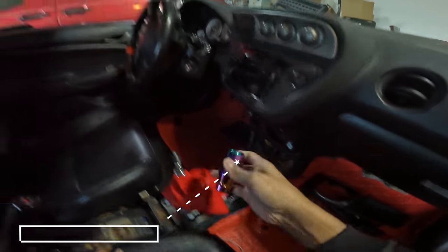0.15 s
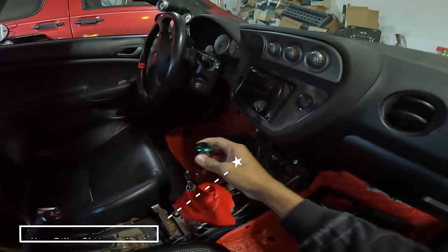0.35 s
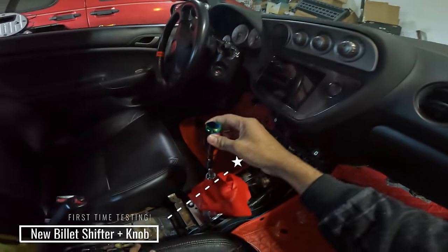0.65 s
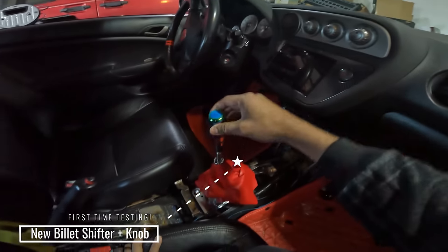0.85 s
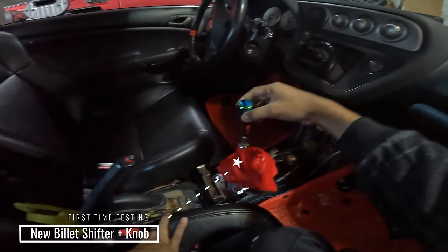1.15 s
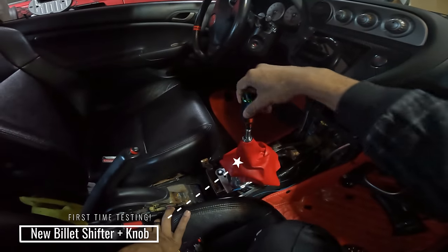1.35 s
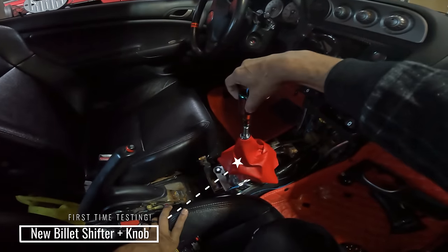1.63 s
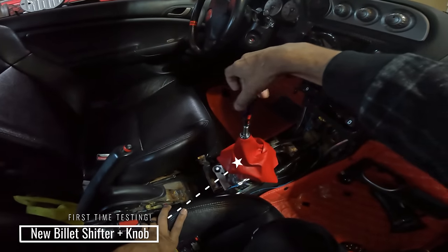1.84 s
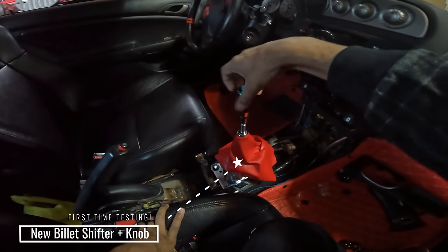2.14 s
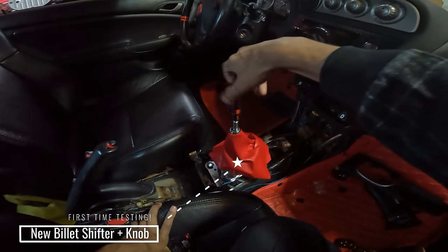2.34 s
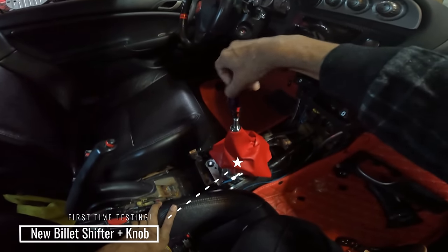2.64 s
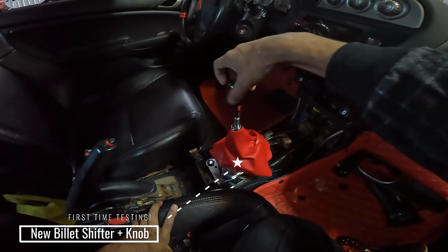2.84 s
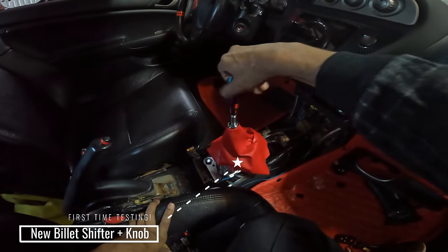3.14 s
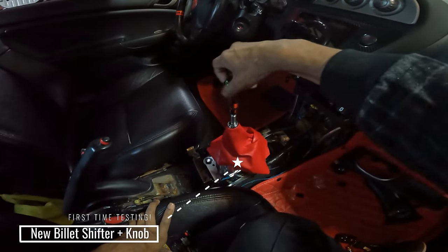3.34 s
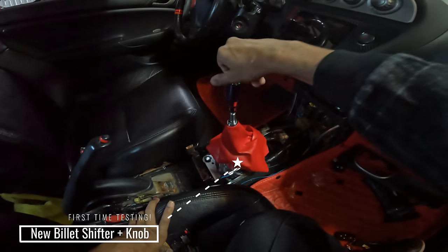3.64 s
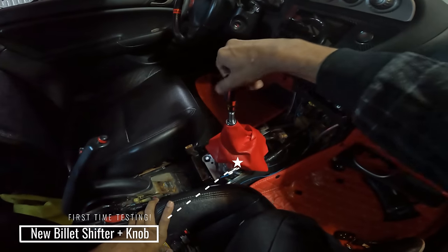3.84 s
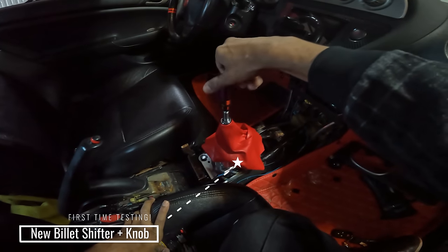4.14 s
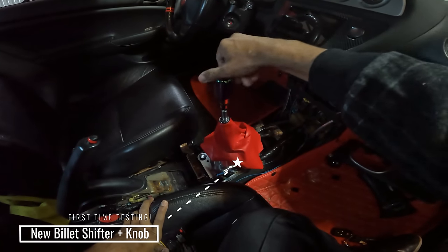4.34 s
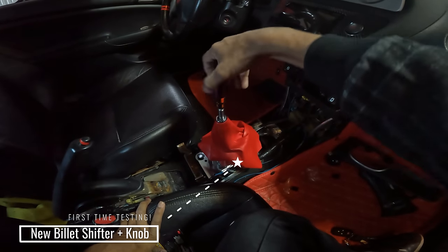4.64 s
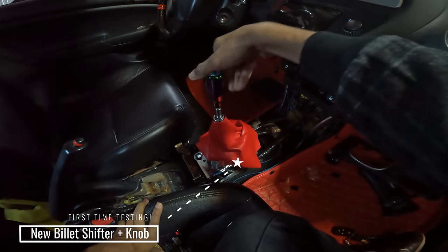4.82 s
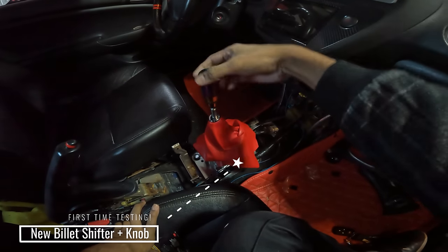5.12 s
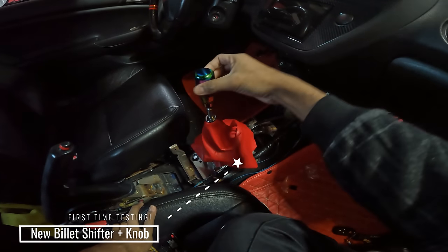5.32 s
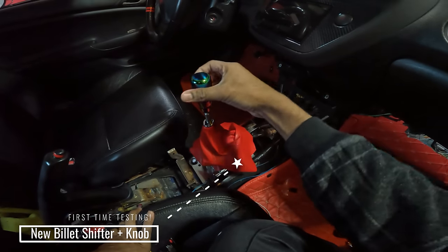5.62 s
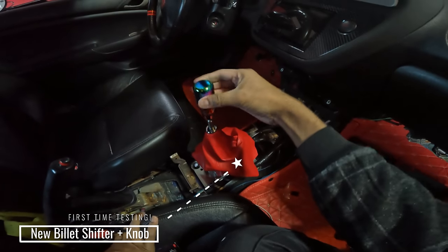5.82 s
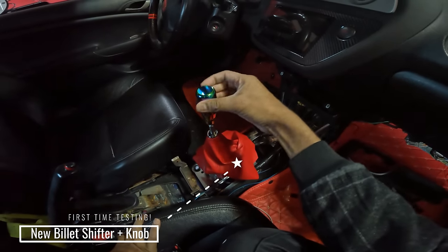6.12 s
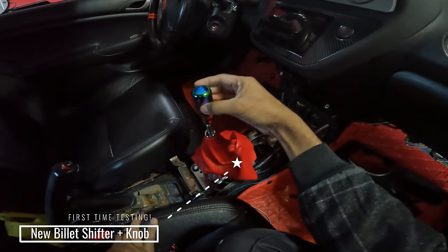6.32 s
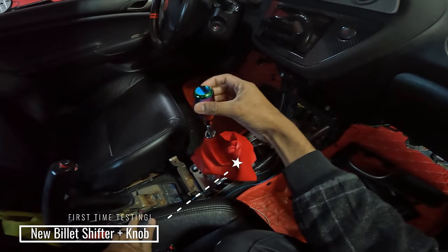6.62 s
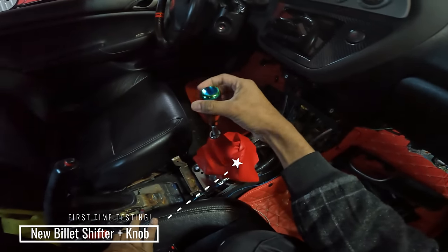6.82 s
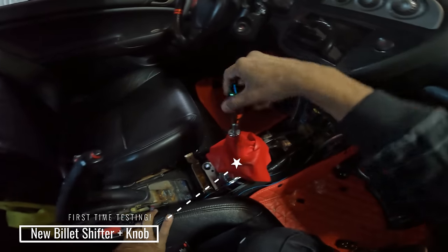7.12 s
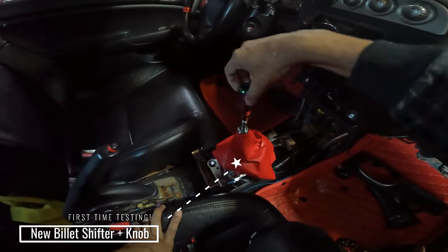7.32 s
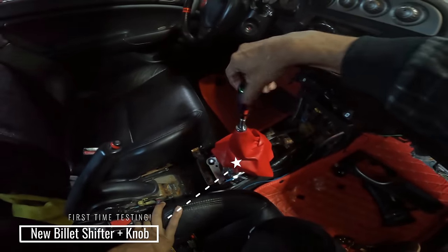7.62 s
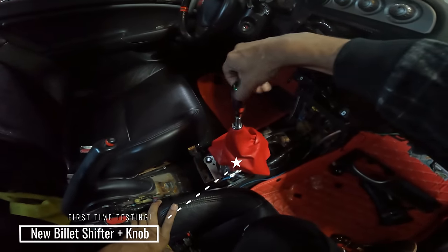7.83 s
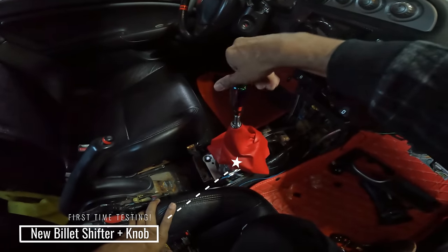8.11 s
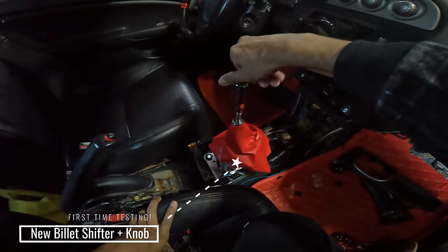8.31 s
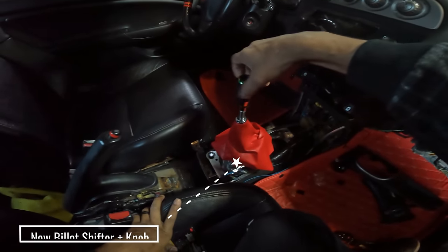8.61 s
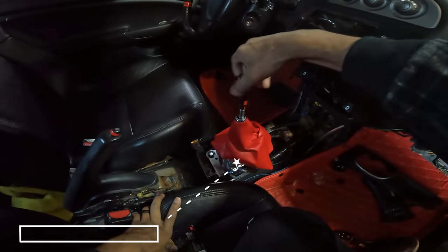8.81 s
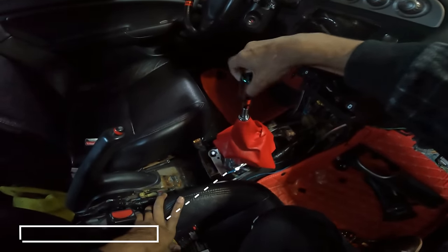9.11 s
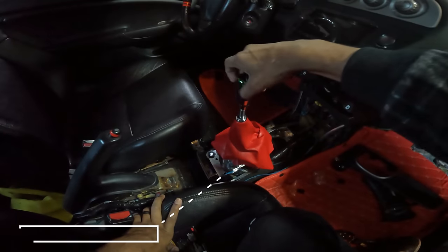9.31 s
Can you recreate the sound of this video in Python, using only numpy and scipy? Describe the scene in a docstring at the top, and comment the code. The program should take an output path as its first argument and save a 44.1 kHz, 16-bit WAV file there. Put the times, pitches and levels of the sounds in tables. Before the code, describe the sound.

A metal gear lever is worked by hand in a still car, heard near in dry stereo. First a dry tick on the left and gritty creaks on the right, then two bright, loud metallic knocks. After that, many quieter woody-metal clunks, soft thuds, short slides, cloth rubs and tiny trim ticks follow unevenly. Thin squeaky scrapes appear late. Wavering bass rumble and soft hiss continue throughout.

```python
"""A fluttering low rumble and microphone hiss run throughout; in the first half second a panel creaks
close on the right. Inside a parked, stripped car cabin, heard from close by, a hand works a metal gear lever.
Stops in the gate ring struck modes of floor pan, housing and linkage; loose metal rattles, the shaft squeaks.
Cloth rustle, sliding and hum are noise through resonances; trim ticks are short contacts through one band."""
import sys
import numpy as np
from scipy import signal
from scipy.fft import rfft, irfft
from scipy.io import wavfile
from scipy.ndimage import uniform_filter1d

SR = 44100
rng = np.random.default_rng(int(sys.argv[2]) if len(sys.argv) > 2 else 0)


def unload_audio(sound):
    """Save the sound as a 16-bit wav file, at the path given as the first command line argument."""
    columns = np.transpose(np.atleast_2d(sound))
    # keep every value between -1 and 1, then stretch to whole-number steps
    steps = np.round(np.clip(columns, -1, 1) * 32767)
    wavfile.write(sys.argv[1], SR, steps.astype(np.int16))


def volts_from_db(level):
    """Convert decibel levels to linear amplitude ratios."""
    exponent = np.asarray(level, float) / 20
    return 10 ** exponent


N = 417186
TIME = np.arange(N) / SR
SIDES = np.array([[1], [-1]])  # left, right


def unit_rms(x):
    """Scale to rms 1, all channels together."""
    return x / np.sqrt(np.mean(x ** 2))


def curve(points):
    """A (t/s, value) table at every sample."""
    return np.interp(TIME, *np.transpose(points))


def walk(rate):
    """Random levels held 1 / rate s and slewed twice; rms 1 before the cut to length."""
    hold = int(SR / rate)
    steps = np.repeat(rng.standard_normal(N // hold + 1), hold)
    slewed = uniform_filter1d(uniform_filter1d(steps, hold), hold)
    return unit_rms(slewed)[:N]


def coloured_pair(spectrum):
    """Two channels of steady noise, joint rms 1, with a (f/Hz, level/dB) spectrum."""
    hz, db = np.transpose(spectrum)
    f = np.maximum(np.fft.rfftfreq(N, 1 / SR), 1)
    gain = volts_from_db(np.interp(np.log(f), np.log(hz), db))
    return unit_rms(irfft(rfft(rng.standard_normal((2, N))) * gain, N))


def band(x, hz, width, times=1):
    """One resonance, gain 1 at its centre, passed several times for steeper sides."""
    for _ in range(times):
        x = signal.lfilter(*signal.iirpeak(min(hz, .45 * SR), hz / width, SR), x)
    return x


def add(out, s, sound):
    """Mix a short sound in at time s."""
    i = int(s * SR)
    out[:, i:i + sound.shape[1]] += sound[:, :N - i]


def strokes(rows, rise_s, fall_s):
    """Gain of (start, length, dB) strokes: linear rise, hold, exponential fall."""
    out = np.zeros(N)
    for s, length, db in rows:
        t = np.maximum(TIME - s, 0)
        out += volts_from_db(db) * np.minimum(t / rise_s, 1) * np.exp(-np.maximum(t - length, 0) / fall_s)
    return out


def ring(modes, rise_s, scatter_db, detune, apart, chatter_s, near_hz=None, free=1, play=0.019, focus_db=0):
    """One blow on a part: modes swell over the contact, are struck again by loose play, and die. Mid peak 1."""
    hz, db, t60 = np.array(modes).T[:, :, None]
    t = TIME[:SR // 4]
    chance = rng.standard_normal((len(modes), 5)).T[:, :, None]
    if near_hz:
        # where the blow lands favours the modes near one pitch; focus_db is the fall per squared octave
        deepest_db = -14
        db = db + np.maximum(-focus_db * np.log2(hz / near_hz) ** 2, deepest_db)
    phase = 2 * np.pi * hz * (1 + detune * chance[0]) * t + 0.52 * chance[1]
    swell = (1 - np.exp(-t / rise_s)) ** 2
    shape = volts_from_db(db + scatter_db * chance[2] - 60 * t / (free * t60)) * swell
    # each ear hears its own phases
    ears = np.array([(shape * np.sin(phase + min(apart, .7) * c)).sum(0) for c in chance[3:]])
    # uneven random rebounds after the first contact
    t_play = t[:SR // 16]
    rebounds = rng.standard_normal(len(t_play)) ** 3 * np.exp(-t_play / chatter_s) * play
    rebounds[0] = 1
    ears = signal.fftconvolve(ears, rebounds[None])[:, :len(t)]
    return ears / np.abs(ears.mean(0)).max()


def burst(hz, width, rise_s, fall_s):
    """A puff of noise in one steep band, unrelated left and right. Peak 1."""
    t = TIME[:SR // 8]
    puff = rng.standard_normal((2, len(t))) * (1 - np.exp(-t / rise_s)) * np.exp(-t / fall_s)
    puff = band(puff, hz, width, times=3)
    return puff / np.abs(puff).max()


# Shape of the low rumble: f/Hz, relative level/dB per Hz
RUMBLE_SPECTRUM = [(8.8, -53), (15, 1.5), (43, 5), (81, -6.5), (110, -13), (140, -42), (240, -120)]
# Slow course of the rumble, around which it flutters: t/s, level/dB
RUMBLE_COURSE = [(0, -51), (.7, -62), (1.1, -53.5), (1.6, -57), (2.6, -52), (4.3, -50.5), (4.9, -51.5),
                 (5.6, -52), (6.6, -52.5), (7.0, -54.5), (8.2, -50), (9.46, -51.5)]


def rumble():
    """Low noise nearly alike at both microphones, its level fluttering a few times a second."""
    mid, side = coloured_pair(RUMBLE_SPECTRUM)
    flutter_db = 3.37 * walk(6)
    return volts_from_db(curve(RUMBLE_COURSE) + flutter_db) * (mid * volts_from_db(0.77 * SIDES) + 0.13 * side * SIDES)


# Shape of the steady noise floor: f/Hz, relative level/dB per Hz
HISS_SPECTRUM = [(59, -20), (100, -2), (160, -9.5), (249, -16), (373, -16.5), (452, -30.5), (676, -21.5),
                 (752, -26), (1800, -32.5), (2580, -32.5), (5650, -39), (15000, -39), (16000, -41)]


def hiss():
    """Steady noise, wavering slightly; the two ports hear the same bass but their own treble."""
    mid, side = coloured_pair(HISS_SPECTRUM)
    side = signal.lfilter(*signal.butter(1, 500, "high", fs=SR), side)
    return volts_from_db(-63.5 + 0.4 * walk(3.8)) * (mid + side * SIDES)


# How hard the hand works the lever: t/s, level/dB
HAND_EFFORT = [(0.0, 8.5), (.45, 9.5), (0.8, 2.5), (1.2, 14.5), (1.6, -2.5), (2.16, -1.5), (3.0, -6.5),
               (3.9, -3), (4.2, -2.5), (4.82, 1.5), (5.12, 8), (5.24, 10), (5.95, 4), (6.3, 5.5),
               (6.46, 1.5), (7.22, -1.5), (7.83, 5.5), (8.7, -17), (9.46, 1)]


def effort_db():
    """Level offset that follows the force of the hand."""
    return curve(HAND_EFFORT)


# Lever slides along its gate, swelling into a stop: t/s of start, length/s, level/dB
GATE_SLIDES = [(1.78, 0.032, -63.5), (2.05, 0.071, -63.5), (2.33, 0.039, -61.5), (2.52, 0.063, -66.5),
               (2.7, 0.042, -69), (2.79, 0.035, -66.5), (2.98, 0.067, -67), (3.09, 0.033, -76),
               (3.21, 0.05, -63.5), (3.4, 0.11, -72), (3.63, 0.031, -74), (3.93, 0.024, -55.5),
               (4.15, 0.071, -67), (4.35, 0.04, -60), (4.53, 0.059, -63.5), (4.78, 0.056, -61),
               (5.14, 0.023, -60), (5.88, 0.12, -78), (6.39, 0.087, -78), (6.62, 0.02, -59.5),
               (7.5, 0.044, -64), (7.75, 0.049, -59.5), (7.93, 0.036, -60.5), (8.1, 0.1, -67),
               (8.32, 0.092, -66), (8.53, 0.087, -62), (8.78, 0.065, -62.5), (8.96, 0.048, -61),
               (9.24, 0.048, -62)]


def sliding():
    """Gain of the slides, shared by the hum and the drag."""
    return strokes(GATE_SLIDES, rise_s=0.019, fall_s=0.0081)


def shaking(column, top_db=0):
    """Gain that each blow kicks up and that then dies away; column 1 is the thud, 2 the housing ring."""
    kicks = np.zeros(N)
    for row in STOPS + SOFT_LEANS:
        kicks[int(row[0] * SR)] += volts_from_db(min(row[column], top_db))
    fall_s = 0.023
    keep = np.exp(-1 / (fall_s * SR))
    # two equal poles: a lone kick peaks at its own level one fall time later
    return signal.lfilter([np.e * (1 - keep)], np.convolve([1, -keep], [1, -keep]), kicks)


def hum():
    """The structure humming under the hand: shaken noise through one pan and one housing resonance."""
    mid, side = rng.standard_normal((2, N))
    shake = (mid + 0.5 * side * SIDES) * volts_from_db(3.94 * walk(20))
    effort, slide = effort_db(), sliding()
    # steady hum + slides + shaking left by the blows
    pan = volts_from_db(-66 + effort) + volts_from_db(2.5) * slide + volts_from_db(-28) * shaking(column=1)
    housing = volts_from_db(-90 + effort) + volts_from_db(-0.5) * slide + volts_from_db(-19.5) * shaking(column=2)
    return pan * unit_rms(band(shake, 158.2, 40.0)) + housing * unit_rms(band(shake, 356.1, 9.2))


def drag():
    """Dense uneven slips of the loose linkage: dull, broad noise that swells while the lever slides."""
    slips = rng.standard_normal((3, N)) * volts_from_db(4 * walk(60))
    slips = slips[0] + 3.2 * slips[1:]  # a little in common, mostly each ear's own
    # the scuffing after a blow is faint: the hand caps its strength at -56 dB
    scuff = volts_from_db(-53) * shaking(column=1, top_db=-56)
    gain = volts_from_db(-77.5 + 0.8 * effort_db()) + scuff + sliding()
    return gain * unit_rms(band(band(slips, 496, 570), 530, 930))


# Modes of the creaking panel: f as a ratio to the slip's f, width/Hz of each pass, relative level/dB
PANEL_MODES = [(.68, 336, -6.5), (1, 544, 2.5), (1.55, 900, -14.5), (2.4, 1800, -22)]


def slip(hz):
    """One slip rings the panel, close to the right port. Peak 1 before the ears' levels."""
    t = TIME[:SR // 40]
    push = rng.standard_normal(len(t)) * (0.24 * np.exp(-t / 0.00029) + 0.032 * np.exp(-t / 0.022))
    push += 1.35 * np.exp(-(t / 0.00005 - 2) ** 2)
    sound = np.zeros(len(t))
    for k, (ratio, width, db) in enumerate(PANEL_MODES):
        sound += (-1) ** k * volts_from_db(db) * band(push, ratio * hz, width, times=2)  # signs alternate
    return volts_from_db([[-40], [6]]) * sound / np.abs(sound).max()


# Slips of a creak on the right: t/s, peak level/dB of the mid, main f/Hz
CREAK_SLIPS = [(0.0662, -53, 2370), (0.11, -47.5, 2620), (0.149, -54, 2400), (0.2761, -41, 2260),
               (0.2881, -40.5, 2480), (0.316, -46, 2230), (0.3614, -35, 2050), (0.37, -32, 2190),
               (0.3776, -31.5, 2330), (0.3886, -32.5, 2280), (0.4384, -29, 2180), (0.446, -29, 2320),
               (0.4533, -31, 2220), (0.466, -35.5, 2300)]


def creak():
    """Every slip rings the same set of panel modes, shifted to its own pitch."""
    out = np.zeros((2, N))
    for s, peak_db, hz in CREAK_SLIPS:
        add(out, s, volts_from_db(peak_db) * slip(hz))
    return out


# Bands of the weave: f/Hz, width/Hz of each pass, relative level/dB
WEAVE_BANDS = [(2680, 550, 9), (3390, 1560, 10), (4020, 650, 1.5)]
# High, airy swishes: t/s of start, length/s, level/dB before the mix of sheen and air
AIRY_SWISHES = [(0.197, 0.0093, -62), (0.477, 0.014, -65.5), (1.18, 0.43, -79.5), (1.81, 0.037, -75),
                (3.23, 0.031, -76.5), (3.45, 0.028, -79), (3.69, 0.036, -76), (4.16, 0.032, -76.5),
                (4.8, 0.016, -74), (5.88, 0.018, -80), (6.23, 0.025, -79), (6.39, 0.014, -71),
                (6.47, 0.018, -70.5), (6.63, 0.014, -77), (6.85, 0.012, -69), (6.885, 0.013, -71),
                (7.21, 0.071, -74), (7.45, 0.077, -78), (8.55, 0.039, -83), (8.99, 0.027, -75),
                (9.22, 0.044, -73)]
# Sleeve rubs: t/s of start, length/s, level/dB before the left-right lean
SLEEVE_RUBS = [(0.72, 0.038, -74.5), (0.8, 0.086, -67.5), (1.17, 0.093, -70), (1.3, 0.28, -74.5),
               (1.61, .14, -71.5), (1.91, 0.016, -72.5), (1.96, 0.037, -68.5), (2.08, 0.045, -67),
               (2.2, 0.08, -66.5), (2.285, 0.067, -62), (2.36, 0.045, -74), (2.45, 0.036, -70.5),
               (2.56, 0.074, -68), (2.66, 0.021, -73), (2.805, 0.042, -67.5), (3.09, 0.03, -74),
               (3.15, 0.013, -73), (3.32, 0.013, -70.5), (3.5, 0.065, -76.5), (3.64, 0.018, -71),
               (3.77, 0.017, -76), (3.97, 0.073, -75), (4.43, 0.03, -71.5), (4.58, 0.075, -76),
               (4.72, 0.23, -76.5), (5.17, 0.073, -71.5), (5.26, 0.077, -69.5), (5.36, 0.49, -74),
               (5.88, 0.2, -71.5), (6.1, 0.19, -76), (6.62, 0.024, -73), (6.71, 0.06, -73),
               (7.02, 0.047, -71), (7.065, 0.067, -69), (7.14, 0.051, -72), (7.19, 0.19, -77),
               (8.75, 0.036, -76), (9.23, 0.092, -79)]


def cloth():
    """Fibres slipping near the left port: noise in the weave's bands with a sheen above; swishes reach the top."""
    fibres = rng.standard_normal((2, N)) * volts_from_db(1.0 * walk(90))
    rustle = unit_rms(sum(volts_from_db(db) * band(fibres, hz, width, times=2) for hz, width, db in WEAVE_BANDS))
    sheen = unit_rms(band(fibres, 9360, 3300, times=2))
    air = unit_rms(band(fibres, 11900, 4700, times=2))
    rub = volts_from_db(6 * SIDES) * rustle + volts_from_db(-6.5) * sheen
    swish = volts_from_db(1.5 * SIDES) * (sheen + 1.34 * air)
    rise_s, fall_s = 0.0052, 0.0089
    return strokes(SLEEVE_RUBS, rise_s, fall_s) * rub + strokes(AIRY_SWISHES, rise_s, fall_s) * swish


# Modes of the loose metal: f/Hz, relative level/dB, t60/s (shortened to 0.5-0.9 of this by the blow)
LOOSE_MODES = [(2170, -4, 0.075), (2354, -5, .08), (2518, -1, 0.074), (2640, 0, .06), (2620, 4.5, 0.069),
               (2720, -5.5, 0.049), (2800, -1.5, .07), (2970, -10, .06), (3186, -1.5, 0.038),
               (3370, 2, 0.08), (3600, 2, 0.066), (3807, -3, 0.069), (3930, -3, .06), (4180, -9, 0.043)]
# Bright rattles: t/s, level/dB that both noise and ring sit below
METAL_RATTLES = [(0.199, -48.5), (0.529, -45), (0.547, -51), (0.558, -55), (0.638, -44), (0.899, -29.5),
                 (1.074, -39), (1.088, -42.5), (1.106, -27), (1.113, -28), (1.124, -41), (1.818, -48.5),
                 (2.779, -45), (4.575, -59), (4.799, -48.5), (4.998, -51), (5.146, -47), (6.391, -45),
                 (6.522, -53), (7.776, -52), (8.144, -60), (9.269, -54)]


def rattles():
    """Loose metal: a puff of bright noise and chattering modes that ring longer after a hard blow."""
    out = np.zeros((2, N))
    for s, db in METAL_RATTLES:
        free = np.interp(db, [-45, -30], [.5, .9])
        add(out, s, volts_from_db(db - 3.5) * burst(2660, 3000, 0.0017, 0.0088))
        metal = ring(LOOSE_MODES, 0.00057, 2.2, 0.0068, 0.82, 0.0081, free=free, play=0.026)
        add(out, s, volts_from_db(db - 7.5) * metal)
    return out


def click(hz, pan_db):
    """A short gritty contact through one broad resonance, with a faint echo off the cabin. Mid peak 1."""
    t = TIME[:SR // 40]
    echo = 0.015 * rng.standard_normal((2, len(t))) * np.exp(-t / 0.011)
    contact = np.exp(-(t / 0.00003 - 2) ** 2)
    grit = 0.8 * rng.standard_normal(len(t)) * np.exp(-t / 0.0007)
    sound = band(echo + contact + grit, hz, hz, times=2) * volts_from_db(pan_db * SIDES / 2)
    return sound / np.abs(sound.mean(0)).max()


# Dry ticks of trim and camera case: t/s, peak level/dB of the mid, f/Hz, left minus right level/dB
TRIM_TICKS = [(0.2179, -30, 10400, 23), (0.217, -38, 3900, 26), (1.3893, -52, 6400, 7),
              (1.4613, -46, 6600, 11), (1.825, -51, 7330, 0.5), (4.7114, -57, 7210, 1.0),
              (4.805, -53, 8840, -2), (4.923, -48, 9690, -11), (5, -53, 6010, 17), (6.3934, -57, 6040, 2),
              (6.4717, -50, 12900, -13), (6.7017, -56, 6330, -0.5), (6.854, -48, 8300, -7),
              (6.8853, -55, 11400, -8), (7.7003, -55, 9280, -9), (9.212, -59, 8000, -1.5)]


def ticks():
    """Broad bright ticks, each resonance as wide as its centre frequency."""
    out = np.zeros((2, N))
    for s, peak_db, hz, pan_db in TRIM_TICKS:
        add(out, s, volts_from_db(peak_db) * click(hz, pan_db))
    return out


# Modes of the floor pan: f/Hz, relative level/dB, t60/s
PAN_MODES = [(69.4, -6.5, 0.12), (120, -11, 0.18), (145.6, 2.5, 0.15), (188, -19.5, 0.16)]
# Modes of the lever housing: f/Hz, relative level/dB, t60/s
HOUSING_MODES = [(241, -12.5, 0.096), (306.3, -10.5, 0.17), (358.3, 6, 0.079), (369.9, -7, 0.23),
                 (469.5, -9, 0.089), (537.6, -9, 0.05)]


def heavy(thud_db, ring_db, soft):
    """Floor pan and housing under one blow, swelling late; soft (0-1) lengthens the contact."""
    thud = ring(PAN_MODES, 0.0034 + 0.0028 * soft, 3.0, 0.052, 0.16, 0.0036)
    housing = ring(HOUSING_MODES, 0.0035 + 0.011 * soft, 0.25, 0.0027, 0.83, 0.0066)
    return volts_from_db(thud_db) * thud + volts_from_db(ring_db) * housing


# Modes of the linkage: f/Hz, relative level/dB, t60/s (scaled by how free the blow leaves it)
LINKAGE_MODES = [(621, 3.5, 0.1), (679, 1.5, 0.11), (763, 1.5, 0.07), (831, 1.5, 0.073), (933, -1, 0.11),
                 (1011, 2, 0.11), (1128, 0, 0.11), (1261, 1, 0.093), (1346, -2, .08), (1484, -1, 0.086),
                 (1574, 4.5, 0.08), (1745, -11, 0.049), (1940, 0, 0.091), (2100, -21, 0.08)]
# Lever meets a hard stop: t/s, floor thud level/dB, housing ring level/dB, linkage clack level/dB, clack f/Hz
# (levels before the lever's lean to the right)
STOPS = [(0.516, -47.5, -51, -45, 840), (0.529, -46.5, -50.5, -44, 1600), (0.538, -60, -64, -43.5, 1000),
         (0.558, -67, -68, -57, 1600), (0.582, -36.5, -43, -41, 860), (0.597, -46, -47, -49, 1100),
         (0.639, -48, -64, -46, 1660), (0.681, -61, -62, -53, 1570), (0.683, -70, -60, -53, 860),
         (0.9, -23.5, -26, -24, 1045), (1.073, -36, -38.5, -35.5, 1430), (1.087, -45, -40, -33.5, 960),
         (1.106, -28.5, -33.5, -29.5, 1250), (1.111, -52, -35.5, -27, 1480),
         (1.122, -36, -27.5, -33.5, 1230), (1.784, -62, -55, -66, 820), (1.801, -55, -62, -59, 1050),
         (1.819, -44.5, -55, -56, 1880), (1.984, -55, -63, -57, 610), (2.062, -46.5, -60, -58, 935),
         (2.1, -45.5, -46, -53, 880), (2.362, -47.5, -61, -63, 950), (2.561, -36.5, -51, -52.5, 800),
         (2.712, -47, -56, -66, 767), (2.778, -45.5, -60, -51, 1500), (2.941, -58, -60, -57, 800),
         (3.04, -50, -65, -56, 674), (3.236, -38.5, -50.5, -68, 825), (3.954, -41.5, -45, -45.5, 1010),
         (3.958, -49, -55, -46, 620), (3.957, -60, -62, -46, 1550), (3.985, -36, -50, -47, 1480),
         (3.988, -63, -68, -43, 620), (3.997, -60, -67, -50, 1280), (4.181, -47, -54, -49, 970),
         (4.372, -40, -46.5, -47.5, 860), (4.578, -44.5, -51.5, -43.5, 754), (4.801, -35.5, -46, -48, 910),
         (4.997, -53.5, -59, -51, 497), (5.142, -33.5, -34.5, -37, 1240), (5.431, -46, -58.5, -42, 830),
         (5.61, -38.5, -54, -51, 790), (5.73, -55, -68, -45.5, 800), (5.875, -56, -47.5, -51, 754),
         (5.928, -40.5, -47, -41, 634), (6.388, -64, -52, -44, 775), (6.395, -37.5, -38, -48, 1920),
         (6.522, -40, -53, -44.5, 990), (6.637, -58, -56, -60, 1010), (6.699, -56, -62, -56.5, 1020),
         (6.869, -58, -64, -44, 1590), (6.934, -60, -67, -61, 1130), (6.866, -42.5, -43.5, -37, 725),
         (7.411, -53, -68, -54.5, 1940), (7.451, -54, -64, -56, 600), (7.54, -44, -50.5, -56, 850),
         (7.768, -41.5, -43.5, -54, 970), (7.779, -36, -55, -41, 950), (7.948, -62, -69, -45, 1850),
         (7.951, -32, -63, -49, 660), (8.11, -58, -52.5, -50, 744), (8.144, -31, -48, -51, 770),
         (8.33, -38.5, -51.5, -60, 770), (8.558, -35.5, -53, -58, 880), (8.803, -39, -49.5, -58, 750),
         (8.982, -32.5, -52, -60, 895), (9.265, -47, -58, -61, 766)]


def knocks():
    """Hard stops: heavy parts swell late and ring on; the light linkage clacks and chatters."""
    out = np.zeros((2, N))
    for s, thud_db, ring_db, clack_db, clack_hz in STOPS:
        # a light blow, or one with little clack, is a soft, long contact
        soft = np.clip(max((thud_db - clack_db - 9.5) / 15, (-48.0 - clack_db) / 12), 0, 1)
        # a light tap stays damped by the hand; a hard one shakes free and rings longer
        free = np.clip(0.47 + (clack_db + 45.5) / 45, .45, 1.2)
        # a light tap sounds one spot of the linkage; a hard one spreads over all of it
        focus_db = np.interp(clack_db, [-44, -30], [60, 16])
        clack = ring(LINKAGE_MODES, 0.00022 + 0.0017 * soft, 1.15, 0.0078, 0.9, 0.0083 * free,
                     clack_hz, free, play=0.008, focus_db=focus_db)
        width = np.interp(clack_db, [-44, -32], [.75, 1.3]) * clack_hz
        noise = burst(clack_hz, width, 0.00018 + 0.0023 * soft, 0.029 * free)
        add(out, s, heavy(thud_db, ring_db, soft))
        add(out, s, volts_from_db(clack_db) * clack)
        add(out, s, volts_from_db(clack_db - 11) * noise)
    return out


# Modes of the lever shaft: f/Hz, width/Hz, relative level/dB before the favouring of one pitch
SHAFT_MODES = [(8260, 270, 0.5), (9000, 53, 5), (9370, 130, 1.5), (9800, 120, -9), (10550, 200, 7)]


def squeak(hz, fall_s):
    """A scrape sets the shaft's high modes singing, most those near one pitch. Peak 1."""
    t = TIME[:SR // 8]
    rub = rng.standard_normal((3, len(t))) * (1 - np.exp(-t / 0.0055)) * np.exp(-(t / (1.53 * fall_s)) ** 2)
    rub = rub[0] + 2.9 * rub[1:]
    sound = np.zeros((2, len(t)))
    for f, width, db in SHAFT_MODES:
        sound += volts_from_db(db - 59 * abs(np.log2(f / hz))) * band(rub, f, width)  # 59 dB down per octave away
    return sound / np.abs(sound).max()


# Thin scrapes of the sliding lever: t/s, level/dB before the mix of squeak and noise, favoured f/Hz,
# fall/s of the noise (the squeak's bell-shaped fall scales with it)
LEVER_SCRAPES = [(0.53, -56.5, 8200, 0.0085), (0.638, -58.5, 8200, 0.012), (0.8973, -48, 8450, 0.012),
                 (1.073, -55, 9300, 0.012), (1.112, -40, 8140, 0.0065), (2.7018, -69, 8300, 0.027),
                 (7.6994, -62, 9100, 0.0092), (7.746, -61, 8150, 0.031), (7.943, -59, 8500, 0.021),
                 (8.1434, -58.5, 8250, 0.024), (8.3454, -65.5, 8260, 0.042), (8.55, -57.5, 8600, 0.032),
                 (8.79, -59.5, 8700, 0.03), (8.984, -57, 9350, 0.024), (9.2399, -66, 8550, 0.022),
                 (9.42, -63, 8600, 0.036)]


def scrapes():
    """Thin scrape of the sliding lever: a squeak of the shaft over a puff of treble noise."""
    out = np.zeros((2, N))
    for s, db, hz, fall_s in LEVER_SCRAPES:
        add(out, s, volts_from_db(db) * (0.99 * squeak(hz, fall_s) + 0.49 * burst(9000, 4500, 0.003, fall_s)))
    return out


# Lever leans softly on its spring, no clack: t/s, floor thud level/dB, housing ring level/dB
# (levels before the lever's lean to the right)
SOFT_LEANS = [(1.5, -54, -57), (1.902, -76, -61), (1.993, -45, -80), (2.16, -58, -50), (2.269, -50, -52),
              (2.518, -41.5, -61), (2.846, -39.5, -57.5), (2.991, -44.5, -54), (3.105, -50, -55.5),
              (3.419, -45, -56), (3.489, -36, -60), (3.651, -41, -49), (4.059, -54, -73),
              (4.228, -47, -51.5), (4.529, -41, -58), (5.07, -41.5, -68), (5.674, -48, -54.5),
              (6.13, -48, -57), (6.223, -40.5, -56.5), (6.282, -51, -60), (6.647, -33.5, -48.5),
              (6.927, -52, -72), (7.703, -41, -50), (7.974, -45, -48.5), (8.124, -37.5, -53),
              (8.191, -40.5, -53), (8.402, -38.5, -63), (8.536, -48, -56), (8.646, -44, -62),
              (8.747, -45.5, -56), (9.168, -47, -65), (9.309, -43.5, -76), (9.425, -51, -64)]


def nudges():
    """Soft leans move only the heavy parts, with a slightly lengthened contact."""
    out = np.zeros((2, N))
    for s, thud_db, ring_db in SOFT_LEANS:
        add(out, s, heavy(thud_db, ring_db, soft=0.3))
    return out


def scene():
    """All sources in the cabin; lever and structure stand a little nearer the right port."""
    lever = (rattles() + knocks() + scrapes() + nudges()) * volts_from_db(-1.2 * SIDES)
    near = rumble() + hiss() + hum() + drag() + lever
    near[0] = np.roll(near[0], shift=4)  # left port hears them 4 samples later
    return near + creak() + cloth() + ticks()


def roll_off(x):
    """The treble ends steeply here."""
    return signal.sosfilt(signal.butter(12, 15760, fs=SR, output="sos"), x)


def record(dry):
    """The finished mix of both ports."""
    return roll_off(dry)


dry = scene()
out = record(dry)
unload_audio(out)
```